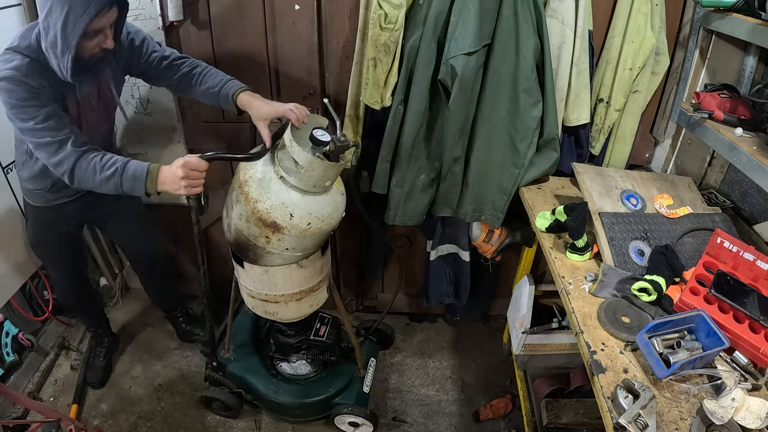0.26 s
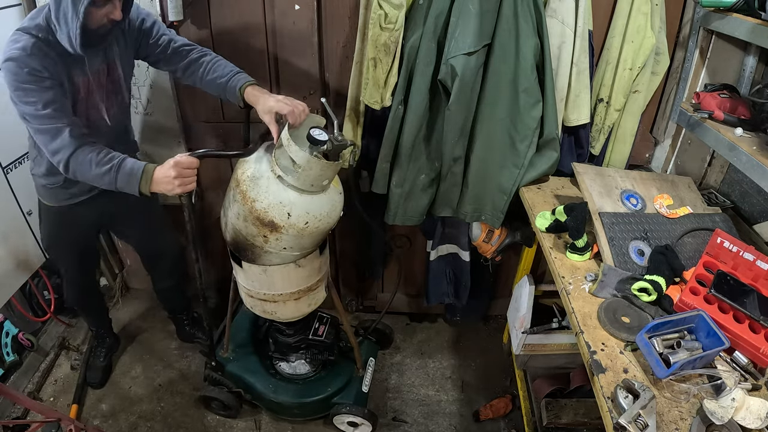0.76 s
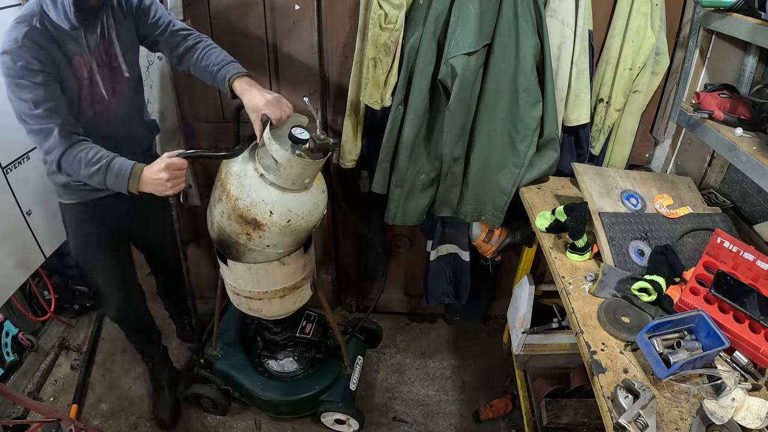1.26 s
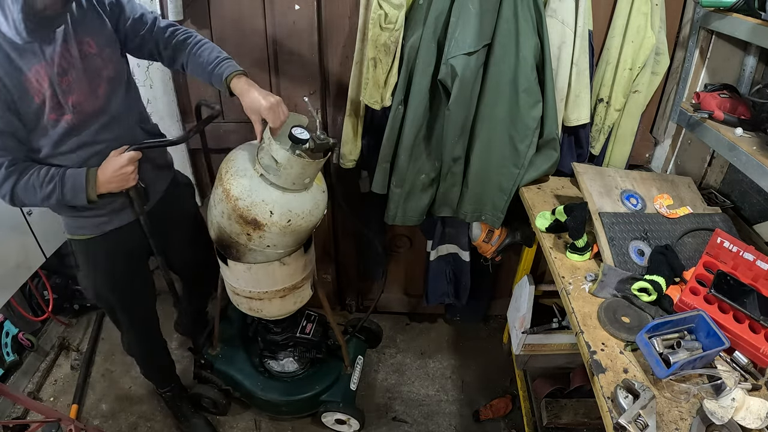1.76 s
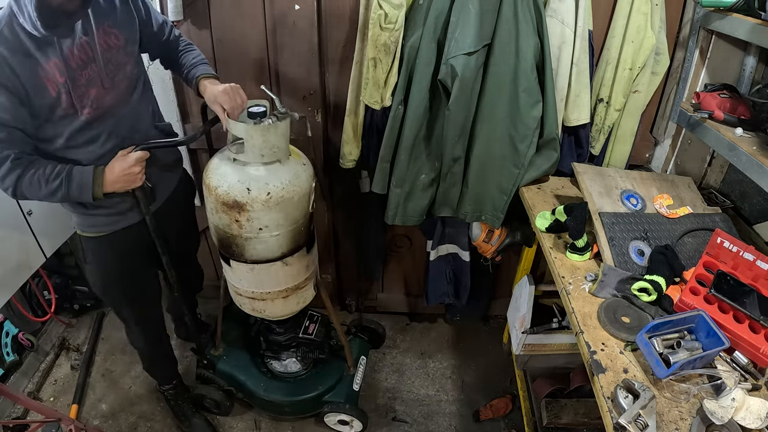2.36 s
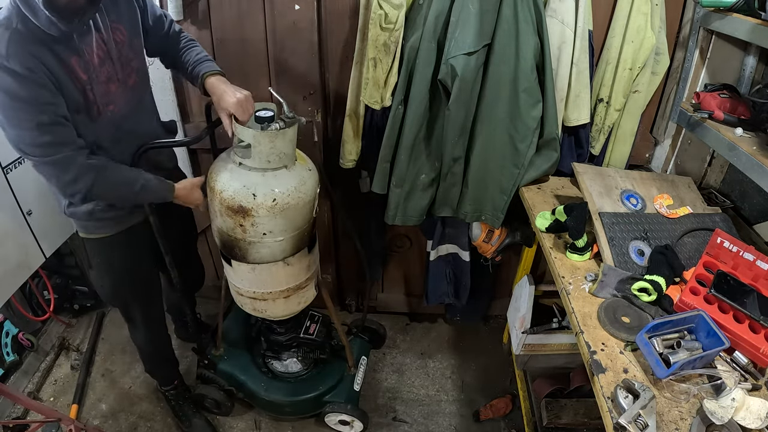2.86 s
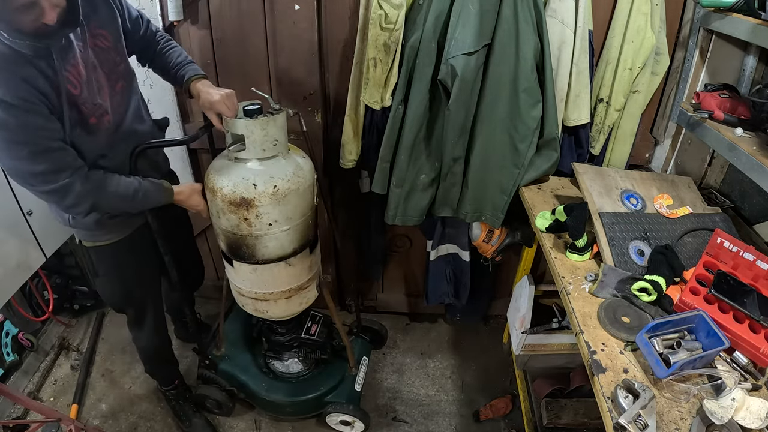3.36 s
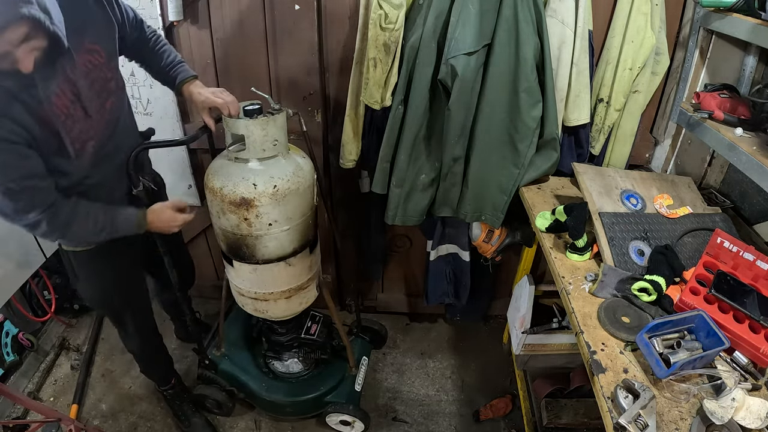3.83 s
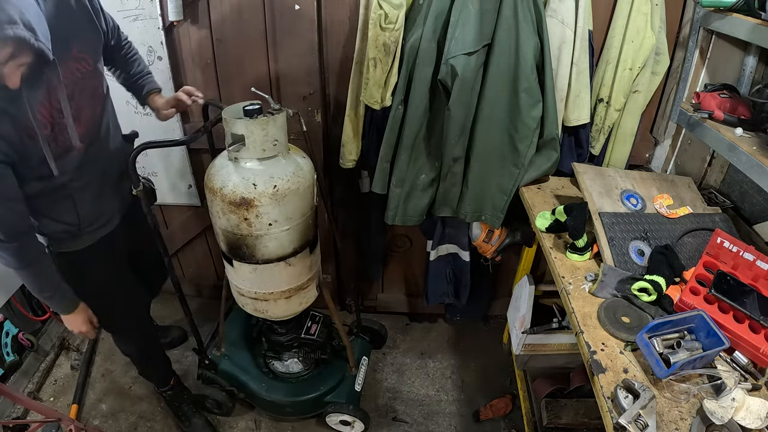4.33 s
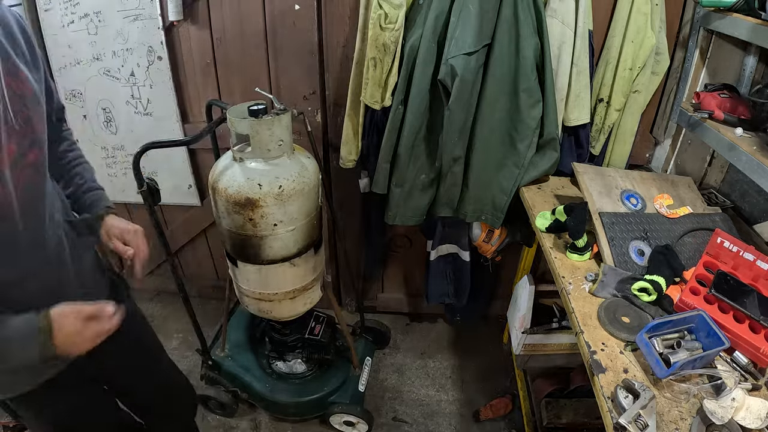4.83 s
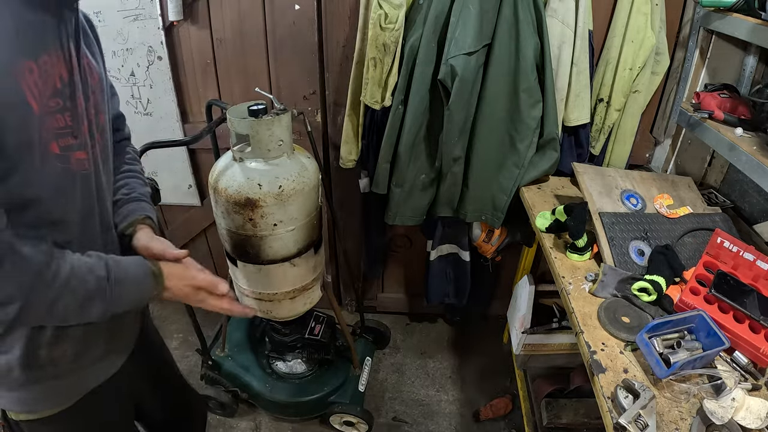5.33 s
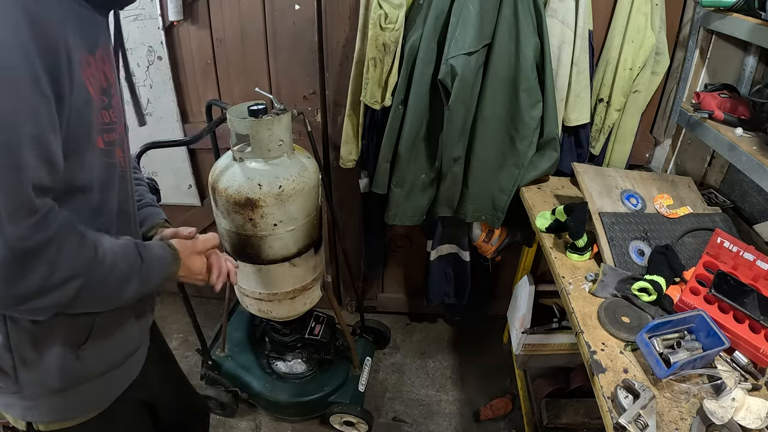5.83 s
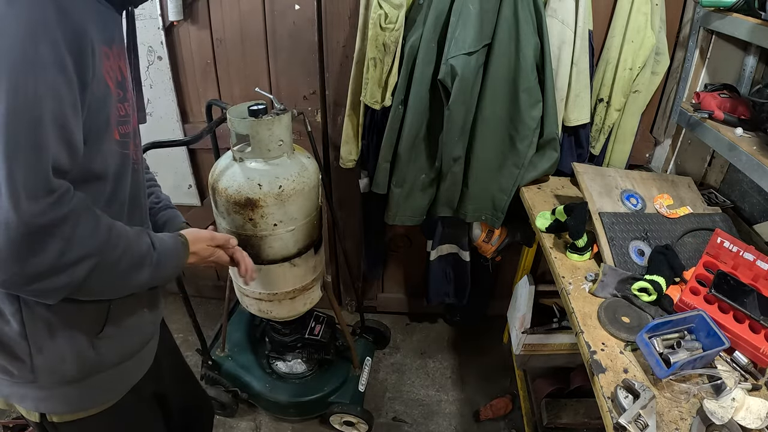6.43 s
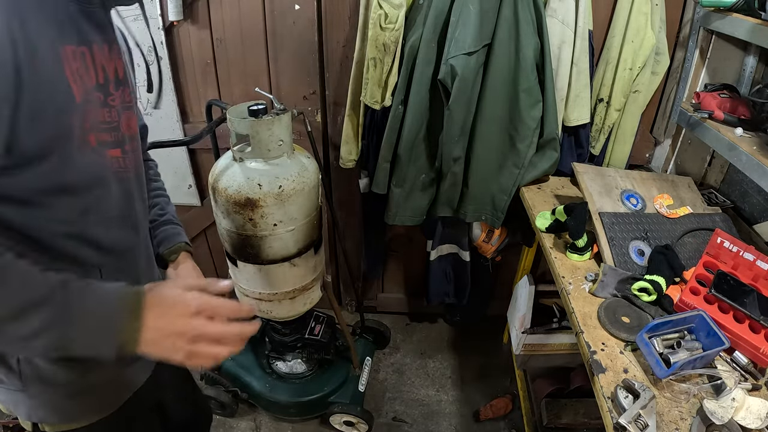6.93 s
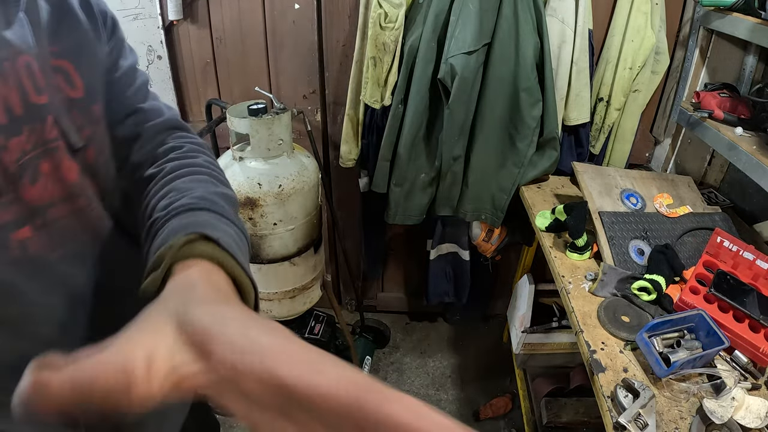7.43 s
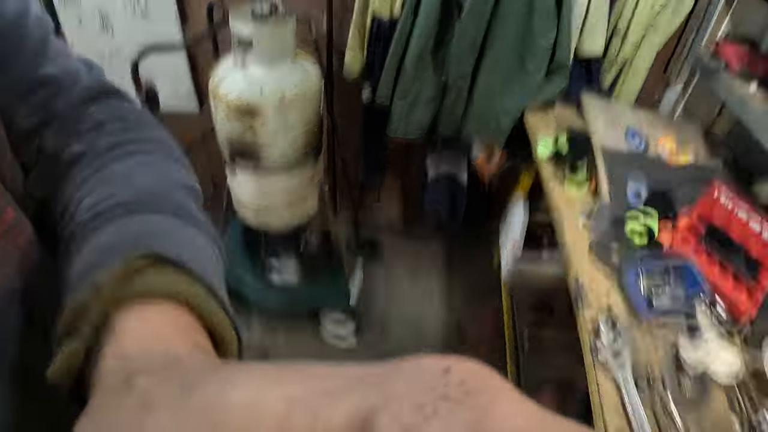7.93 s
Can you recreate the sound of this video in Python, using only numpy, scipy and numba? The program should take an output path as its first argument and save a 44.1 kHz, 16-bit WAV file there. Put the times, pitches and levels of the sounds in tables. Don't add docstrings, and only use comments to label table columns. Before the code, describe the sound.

A small air-driven engine puffs in sharp hissing bursts, slows, stalls and leaks thinly, until a hand knocks the camera in a quiet shed.

```python
import sys
import numpy as np
from scipy import signal
from scipy.fft import rfft, irfft
from scipy.io import wavfile
from scipy.ndimage import uniform_filter1d
from numba import njit

SR = 44100
rng = np.random.default_rng(int(sys.argv[2]) if len(sys.argv) > 2 else 0)


def magnitude_from_level(level_db):
    exponent = np.asarray(level_db, float) / 20
    return 10 ** exponent


def pcm_store(signal):
    levels = np.round(np.clip(np.atleast_2d(signal), -1, 1) * 32767)
    wavfile.write(sys.argv[1], SR, levels.astype(np.int16).T)


N = 360815
T = np.arange(N) / SR
HZ = np.arange(N // 2 + 1) * SR / N + 1e-3

# opening in seconds, full flow in seconds, hiss level in dB, pop peak in dB.
PUFFS = [(-0.15, 0.1583, -20.5, -41), (0.105, 0.1468, -22, -34), (0.361, 0.1088, -19.5, -28.5),
         (0.571, 0.1585, -22, -43), (0.832, 0.1108, -19.5, -31.5), (1.046, 0.1557, -22, -34),
         (1.313, 0.1061, -20.5, -30.5), (1.518, 0.1434, -21.5, -32.5), (1.769, 0.1076, -20, -32),
         (1.978, 0.1591, -21.5, -39.5), (2.236, 0.116, -21.5, -29), (2.451, 0.1459, -22.5, -38.5),
         (2.715, 0.1174, -22.5, -28.5), (2.936, 0.1564, -21.5, -36), (3.21, 0.1177, -21.5, -34.5),
         (3.431, 0.1776, -22.5, -33.5), (3.733, 0.1129, -21.5, -34), (3.954, 0.1737, -22.5, -40.5),
         (4.248, 0.1233, -22.5, -31), (4.473, 0.1788, -23.5, -36.5), (4.774, 0.0834, -23.5, -41),
         (4.986, 0.3954, -25, -45.5), (5.417, 0.0495, -32, -70), (5.593, 0.1428, -23.5, -43.5),
         (5.856, 0.4403, -23.5, -53), (6.355, 0.0781, -31.5, -68.5), (6.56, 0.1378, -22.5, -43),
         (6.825, 0.426, -23, -45.5)]
# centre in Hz, width in Hz, level in dB.
MUFFLER_MODES = [(1749, 38, 3.5), (1885.2, 51.7, -3.5), (1993.7, 28, -7), (2079.5, 11, -5.5),
                 (2523.8, 47.4, 0), (2574, 6.1, -4), (4170.3, 46.3, -7.5), (4550, 15.8, -10.5),
                 (4983, 40.2, -8.5), (5510.6, 24, -11), (5847, 13.4, -17.5), (6363, 41, -13.5),
                 (6610, 51.4, -10), (7140, 82.5, -16.5), (7520, 15, -25), (8220, 88, -38),
                 (9423, 37.8, -14), (9737, 144, -19), (10700, 24, -35.5), (11605, 80, -22),
                 (12300, 58, -35.5), (13240, 54, -28.5)]
# centre in Hz, width in Hz, level in dB.
LINGERING_MODES = [(1743.9, 92, 2), (1958.4, 165, -2)]
# frequency in Hz, level in dB per Hz.
JET_SPECTRUM = [(1650, -6.5), (2000, -7), (2280, 3), (2600, -12), (2900, -17.5), (4150, -4.5),
                (5200, -20.5), (6000, -6.5), (6850, -24.5), (7500, -8), (8600, -18), (10000, -14.5),
                (12000, -20.5), (15000, -26.5)]
# Hz at opening, Hz at mid stroke, Hz at shutting, width in Hz, gain in dB.
BORE_PEAKS = [(1730, 1790, 2150, 110, 6), (3950, 4280, 4450, 130, 7), (4600, 5900, 6500, 200, 12),
              (5300, 7250, 7750, 200, 11), (8700, 9400, 10200, 250, 6), (9900, 10900, 11500, 250, 8),
              (11300, 11900, 12700, 250, 6), (13700, 13200, 12700, 250, 8), (1150, 1300, 1760, 450, -14),
              (3150, 3200, 3300, 700, -14), (3450, 3680, 3950, 1000, -32), (5000, 5200, 5500, 400, -13),
              (6200, 6900, 7400, 450, -13)]
# Hz at opening, Hz at mid stroke, Hz at shutting, width in Hz, level in dB.
HUM_MODES = [(200, 304.4, 590.2, 29.5, 0), (364, 376, 828, 530, -9.5), (624, 633, 667, 16.7, -2.5),
             (1051, 1025, 1008, 204, -7.5)]
# frequency in Hz, level in dB per Hz.
RUSH_SPECTRUM = [(100, -38), (300, -4.5), (600, -16), (1100, -11), (1400, -28), (1700, 3.5), (3000, -17),
                 (3600, -22.5)]
# frequency in Hz, level in dB per Hz.
SEAT_SPECTRUM = [(400, 0), (1000, 13.5), (3500, 8.5), (8000, 6.5), (12000, -78.5), (15600, -42)]
SEAT_STEPS_DB = [-28, -5, -11, -42, -12, -9, -32]
# centre in Hz, width in Hz, level in dB.
LEAK_MODES = [(1772, 60, 8.5), (2504, 45, -7), (3900, 25.5, -9.5), (4880, 65, -11.5), (5646, 26.5, -4),
              (6329, 51, 3.5), (7230, 247, -4), (7710, 48, -2.5), (9340, 110, -1), (10340, 102, -10),
              (11660, 260, -12)]
# frequency in Hz, level in dB per Hz.
LEAK_SPECTRUM = [(35, -43.5), (60, -17), (231, -11), (533, -23.5), (705, -4), (1590, 0), (2250, -0.5),
                 (2530, -5), (2710, -14), (3760, -6.5), (4220, -11.5), (6560, -6), (12000, -20),
                 (15500, -47)]
# start in seconds, length in seconds, level in dB, resonance in Hz, width in Hz.
SCUFFS = [(.0, 0.0472, -40, 147.3, 114), (0.21, 0.0438, -25, 182.7, 117), (.28, 0.022, -48, 200, 150),
          (1.269, 0.095, -38.5, 160, 118.5), (2.07, 0.125, -26.5, 342, 89.3), (2.075, 0.226, -29, 211, 71),
          (2.623, 0.085, -37.5, 171, 119), (3.3, 0.1183, -33.5, 200, 200), (5.581, 0.023, -41.5, 329, 119),
          (5.581, 0.046, -37, 139.4, 79.4), (5.663, 0.056, -54.5, 87.8, 93),
          (7.345, 0.0253, -51, 117.9, 151)]
# start in seconds, thump in dB, thump in Hz, crack in dB, left minus right in dB.
GRIPS = [(7.689, -30.5, 128, -38.5, 2.5), (7.718, -17, 391, -22.5, -5), (7.785, -24, 223, -35, -9),
         (7.812, -18, 173, -19, 4.5), (7.893, -17.5, 373, -27, -5.5), (7.921, -19.5, 500, -32, -10.5),
         (7.925, -15, 104.8, -28, -2.5), (7.954, -42, 61.9, -37.5, -5), (7.97, -19.5, 97.6, -32.5, -8),
         (7.996, -24.5, 102, -43, -8.5), (8.028, -21.5, 123, -27.5, -8.5), (8.046, -19, 91, -26, 5.5),
         (8.055, -19.5, 79.4, -28.5, -10.5), (8.065, -15.5, 99, -26, 3), (8.102, -21, 61.5, -26, -5),
         (8.124, -18, 242.7, -31, -16.5), (8.131, -36.5, 72.7, -30, 1)]
# centre in Hz, width in Hz, level in dB.
CASE_MODES = [(990, 620, 8), (1417, 217, 5.5), (1870, 314, 0), (2640, 260, 0.5), (3970, 610, -51),
              (7500, 1200, -41)]
# frequency in Hz, gain in dB.
CASE_DULLING = [(2500, 0.5), (4500, -4.5), (9000, -25)]
# frequency in Hz, echo level in dB.
WALL_ECHO = [(100, -21), (600, -6.5), (1700, -9.5), (2500, -4), (3500, -3.5), (7000, -8.5), (10000, -8.5),
             (13000, -2)]
# frequency in Hz, level in dB per Hz.
SHED_SPECTRUM = [(18, -45), (30, -56.5), (182, -4.5), (277, -29), (410, -3), (787, -5), (1870, 0),
                 (3150, -13), (3590, -14), (3980, -6), (5450, -2.5), (10700, -17), (15500, -45)]
# frequency in Hz, left minus right in dB.
PORT_LEVELS = [(60, 2), (110, -2), (200, 1), (380, -0.5), (700, -1.5), (1290, 1.5), (2380, 2), (4400, 0.5),
               (8120, 2.5), (15000, 6)]
# frequency in Hz, left lead in radians.
PORT_PHASES = [(1000, 0), (1750, -.2), (2330, -.55), (3270, -.3), (5250, -.2), (7400, -.1), (12000, 0)]
# frequency in Hz, gain in dB.
MIC_RESPONSE = [(11000, -4), (12300, -6.5), (13500, -12), (14500, -20.5), (15700, -14.5)]

CLOSING_S, LAST_CLOSING_S = 0.03633, 0.23
SIGH_BELOW_DB = -27
BRISK_STROKE_S, TANK_SAGS_FROM_S = 0.1199, 2.82
HUM_DB, HUM_SAG_DB_PER_S, HUM_DB_PER_SLOWING, HUM_SIGH_DB = -30.5, 1.26, 4.5, -44
SHAKE_DB, SHAKE_SAG_DB_PER_S, SHAKE_DB_PER_SLOWING, SHAKE_SIGH_DB = -47.5, 2.26, 4, -28.5
SHAKE_SLEW_S, DRAG_SHAKE_DB = 0.16, -15.5
LEAK_FROM_S, LEAK_RISE_S, LEAK_START_DB, LEAK_DB, LEAK_SAG_DB_PER_S = 7.297, 0.476, -35, -30, 9
RUB_DB, RUB_BEFORE_S, RUB_AFTER_S = -6.5, 0.0066, 0.0276
SHED_DB = -42
DUCK_DB, DUCK_FULL_DB, DUCK_S = -5.5, -27.5, 0.0273


def unit(x):
    return x / np.sqrt(np.mean(x ** 2))


def noise():
    return rng.standard_normal(N)


def along(table, hz):
    f, v = np.transpose(table)
    return np.interp(np.log(hz), np.log(f), v)


def colour(x, table):
    return irfft(rfft(x) * magnitude_from_level(along(table, HZ)), N)


def ring(x, modes):
    response = 0
    for f, width, db in modes:
        damping = 1j * HZ * width
        response = response + magnitude_from_level(db) * damping / (f * f - HZ ** 2 + damping)
    return irfft(rfft(x) * response, N)


def band(hz, kind, order):
    return signal.butter(order, hz, kind, fs=SR, output="sos")


def walk(rate):
    k = int(SR / rate)
    held = np.repeat(rng.standard_normal(N // k + 1), k)
    return unit(uniform_filter1d(uniform_filter1d(held, k), k)[:N])


@njit
def svf(x, hz, width):
    y, b, l = np.empty(len(x)), 0., 0.
    for i in range(len(x)):
        g, k = np.tan(np.pi * hz[i] / SR), width / hz[i]
        v = (b + g * (x[i] - l)) / (1 + g * (g + k))
        b, l, y[i] = 2 * v - b, l + 2 * g * v, k * v
    return y


def add(out, s, x):
    i = int(s * SR)
    if i >= 0:
        out[..., i:i + x.shape[-1]] += x[..., :N - i]


def engine():
    hiss_db, hum_db = openings()[3:5]
    stroke, sigh = piston()
    eddies = [3.5 * walk(rate=26) for _ in BORE_PEAKS]
    flow = valve(hiss_db, steps_db=[-39.5, -2.5, 2.0, 3.0, 0.5, -14.0, -53.0])
    flow = flow * magnitude_from_level(0.986 * walk(rate=25) + 0.85 * walk(rate=90))
    muffled_jet, free_jet = [bore(noise(), stroke, eddies) for _ in range(2)]

    cut_on = band(1660, "high", 9)
    steady = ring(muffled_jet, MUFFLER_MODES)
    tones = signal.sosfilt(cut_on, ring(flow * muffled_jet, MUFFLER_MODES)) / np.sqrt(np.mean(steady ** 2))
    hiss = flow * unit(signal.sosfilt(cut_on, colour(free_jet, JET_SPECTRUM)))

    low_flow = valve(hum_db, steps_db=[-31, -9.5, -1.0, 4.0, 2.0, -4, -14.0]) * magnitude_from_level(2.4 * walk(rate=30))
    hum = unit(signal.sosfilt(band([150, 1500], "band", 4), glide(noise(), HUM_MODES, stroke)))
    rush = unit(colour(noise(), RUSH_SPECTRUM))
    low = low_flow * (magnitude_from_level(-1) * hum + magnitude_from_level(0.5) * rush)
    return magnitude_from_level(1.5) * tones + magnitude_from_level(-5.5) * hiss + seat(flow, sigh) + low


def seat(flow, sigh):
    hiss_db, hum_db = openings()[3:5]
    spray_gain = magnitude_from_level(10.0) * valve(hum_db, SEAT_STEPS_DB) + magnitude_from_level(-6) * sigh * flow
    weak_flow = valve(hiss_db, steps_db=[-30.5, -7.5, -11, -18.5, -9.5, -12, -25]) + sigh * flow
    lingering = unit(ring(ring(noise(), LINGERING_MODES), LINGERING_MODES))
    return spray_gain * unit(colour(noise(), SEAT_SPECTRUM)) + weak_flow * lingering


def valve_pops():
    out = np.zeros(N)
    t = np.arange(2600) / SR
    pop = -np.sin(2 * np.pi * 48 * t) * (t / 0.00648) * np.exp(1 - t / 0.00644)
    opens, *_, pop_db = openings()
    for j, (s, db) in enumerate(zip(opens, pop_db)):
        intake = j % 2 == 0 and j < 21
        add(out, s + (.011 if intake else .004) - .009, magnitude_from_level(db + 6.0) * pop)
    return out


def openings():
    opens, lasts, hiss_db, pop_db = np.transpose(PUFFS)
    fades = opens + lasts
    closing = np.where(opens == opens[-1], LAST_CLOSING_S, CLOSING_S)
    hum_db = effort(HUM_DB, HUM_SAG_DB_PER_S, HUM_DB_PER_SLOWING, HUM_SIGH_DB)
    return opens, fades, fades + closing, hiss_db, hum_db, pop_db


def effort(top_db, sag_db_per_s, db_per_slowing, sigh_db):
    opens, lasts, hiss_db, _ = np.transpose(PUFFS)
    slowing = np.log2(np.maximum(lasts / BRISK_STROKE_S, 1))
    sag_db = sag_db_per_s * np.maximum(opens - TANK_SAGS_FROM_S, 0)
    return top_db - sag_db - db_per_slowing * slowing + sigh_db * (hiss_db < SIGH_BELOW_DB)


def piston():
    opens, fades, shuts, hiss_db = openings()[:4]
    shuts = np.minimum(shuts, fades + 0.037)
    k = np.clip(np.searchsorted(opens - .015, T) - 1, 0, None)
    stroke = np.clip((T - opens[k]) / (shuts[k] - opens[k]), 0, 1)
    sigh = hiss_db[k] < SIGH_BELOW_DB
    return np.where(sigh, .56, stroke) + .035 * walk(rate=9), sigh


def valve(level_db, steps_db):
    gain = np.zeros(N)
    opens, fades, shuts = openings()[:3]
    for a, b, c, db in zip(opens, fades, shuts, level_db):
        c = max(c, b + .02)
        times_s = [a - .014, a, a + 0.01935, (a + b) / 2, b, c, c + 0.044]
        gain += magnitude_from_level(db + np.interp(T, times_s, steps_db, left=-120, right=-120))
    return gain


def track(stops_hz, stroke):
    return np.interp(stroke, [0, .5, 1], stops_hz)


def bore(x, stroke, eddies):
    for (*hz, width, db), eddy in zip(BORE_PEAKS, eddies):
        gain = magnitude_from_level(db + (db > 0) * eddy)
        x = x + (gain - 1) * svf(x, track(hz, stroke), 1. * width)
    return x


def glide(x, modes, stroke):
    return sum(magnitude_from_level(db) * svf(x, track(hz, stroke), 1. * width) for *hz, width, db in modes)


def leak():
    whistle = unit(ring(noise(), LEAK_MODES))
    air = unit(colour(noise(), LEAK_SPECTRUM))
    since = T - LEAK_FROM_S
    rise_db = LEAK_START_DB + (LEAK_DB - LEAK_START_DB) * since / LEAK_RISE_S
    sag_db = LEAK_DB - LEAK_SAG_DB_PER_S * (since - LEAK_RISE_S)
    seep = (since > 0) * magnitude_from_level(np.minimum(rise_db, sag_db)) * magnitude_from_level(0.43 * walk(rate=13))
    return seep * (whistle + magnitude_from_level(-2.5) * air)


def hand():
    thumps, cracks, slide = np.zeros((2, N)), np.zeros((2, N)), np.zeros(N)
    t = np.arange(2048) / SR
    for s, thump_db, hz, crack_db, pan_db in GRIPS:
        ears = magnitude_from_level(np.array([[pan_db], [-pan_db]]) / 2)
        thump = np.sin(2 * np.pi * hz * t) * np.exp(-t * hz)
        crack = rng.standard_normal(2048) * (1 - np.exp(-t / 0.0003)) * np.exp(-t / 0.00645)
        add(thumps, s, ears * magnitude_from_level(thump_db + 5.5) * thump)
        add(cracks, s, ears * magnitude_from_level(crack_db + 11.5) * crack)
        away = np.maximum((s - T) / RUB_BEFORE_S, (T - s) / RUB_AFTER_S)
        slide += magnitude_from_level(thump_db + RUB_DB) * np.exp(-away)
    skin = noise() + 1.81 * np.array([noise(), noise()])
    rub = unit(colour(skin, [(20, -10), (60, -9), (120, -17.0), (300, -12), (1000, -47)]))
    rub = slide * rub * magnitude_from_level(np.array([[-3], [3]]) / 2)
    return thumps + colour(ring(cracks, CASE_MODES), CASE_DULLING) + rub


def boots():
    out = np.zeros(N)
    for s, length, db, hz, width in SCUFFS:
        n = int((length + 0.12) * SR)
        t = np.arange(n) / SR
        slips = rng.standard_normal(n) * (rng.random(n) < 1400 / SR)
        slips = slips * np.interp(t, [0, .004, length, length + 0.012], [0.136, 0.805, 0.56, 0.0915])
        f = np.full(n, 1. * hz)
        add(out, s, magnitude_from_level(db) * unit(svf(svf(slips, f, 2. * width), f, 1. * width)))
    return out


def rumble():
    opens, _, shuts, *_ = openings()
    shaft_db = effort(SHAKE_DB, SHAKE_SAG_DB_PER_S, SHAKE_DB_PER_SLOWING, SHAKE_SIGH_DB)
    shaft = magnitude_from_level(np.interp(T, (opens + shuts) / 2, shaft_db))
    drag = sum(magnitude_from_level(db + DRAG_SHAKE_DB) * (T > s) * (T < s + length) for s, length, db, *_ in SCUFFS)
    gain = shaft + uniform_filter1d(drag, int(SHAKE_SLEW_S * SR))
    deck = [(20, -3.5), (45, 3), (70, -5), (100, -25.5), (150, 0.0), (260, -3.5), (500, -28.0)]
    return gain * magnitude_from_level(3.5 + 5.83 * walk(rate=6.6)) * unit(colour(noise(), deck))


def echo(x, t60_s):
    t = np.arange(16384) / SR
    tail = rng.standard_normal((2, len(t))) * np.exp(-np.log(1000) * t / t60_s) * (t > .003)
    tail /= np.sqrt((tail ** 2).sum(axis=1, keepdims=True))
    return colour(irfft(rfft(x) * rfft(tail, N), N), WALL_ECHO)


def still_air(air):
    middle, side = [colour(noise(), SHED_SPECTRUM) for _ in range(2)]
    room = magnitude_from_level(SHED_DB) * unit(middle + 0.343 * side * np.array([[1], [-1]]))
    loudness = uniform_filter1d(np.abs(air), int(DUCK_S * SR)) / magnitude_from_level(DUCK_FULL_DB)
    return room * magnitude_from_level(DUCK_DB * np.minimum(loudness, 1))


def scene():
    air = engine()
    near = air + leak() + boots() + rumble()
    lean = magnitude_from_level(along(PORT_LEVELS, HZ) / 2) * np.exp(.5j * along(PORT_PHASES, HZ))
    direct = irfft(rfft(near) * np.array([lean, 1 / lean]), N)
    return direct + valve_pops() + echo(near, t60_s=0.112) + still_air(air) + hand()


def low_pass(x):
    return signal.sosfilt(signal.butter(12, 15680, fs=SR, output="sos"), x)


def record(dry):
    top = signal.ellip(8, .2, 60, 15650, fs=SR, output="sos")
    heard = signal.sosfilt(top, colour(dry, MIC_RESPONSE))
    return low_pass(heard)


dry = scene()
out = record(dry)
pcm_store(out)
```